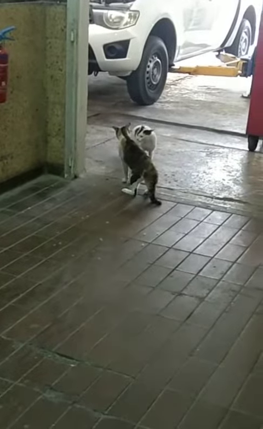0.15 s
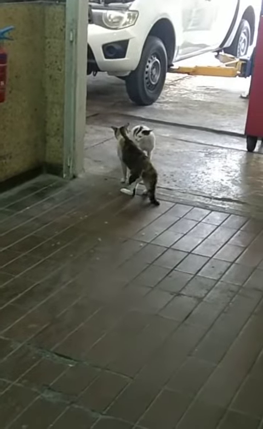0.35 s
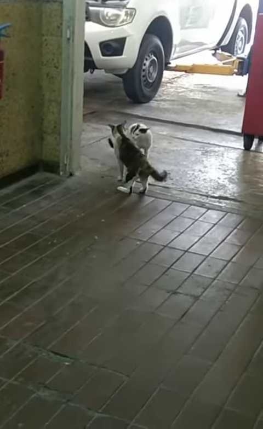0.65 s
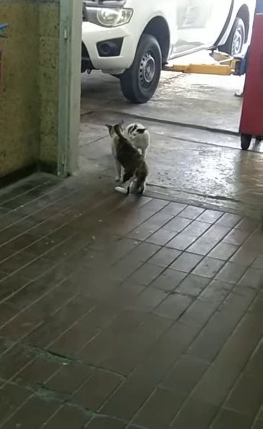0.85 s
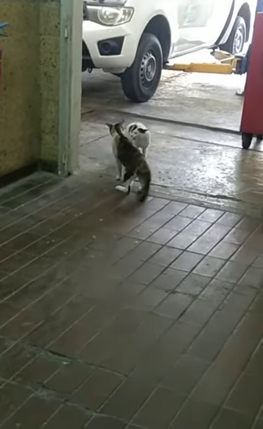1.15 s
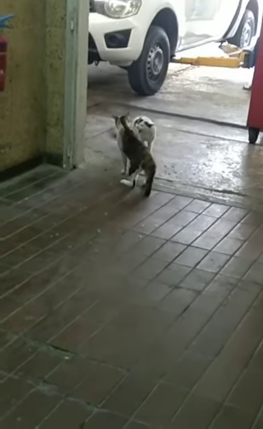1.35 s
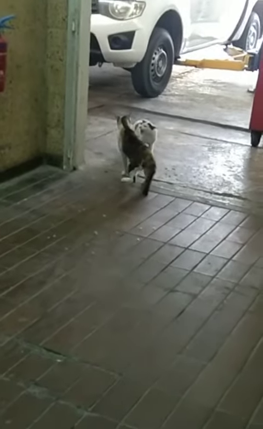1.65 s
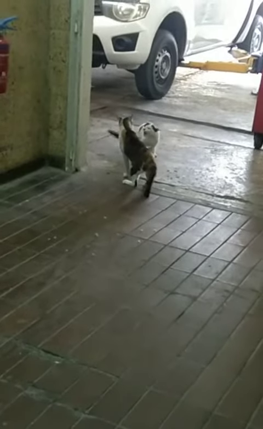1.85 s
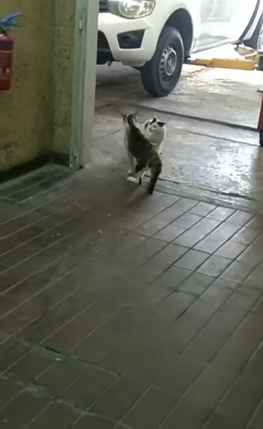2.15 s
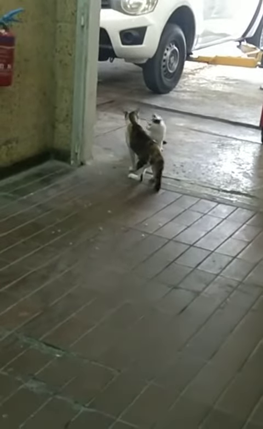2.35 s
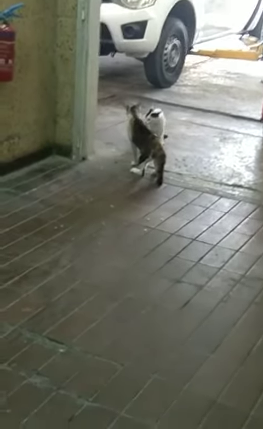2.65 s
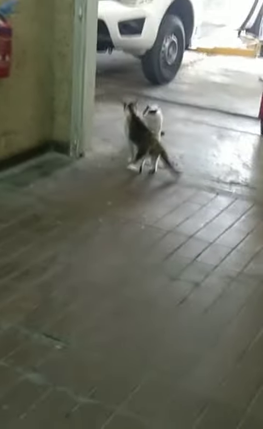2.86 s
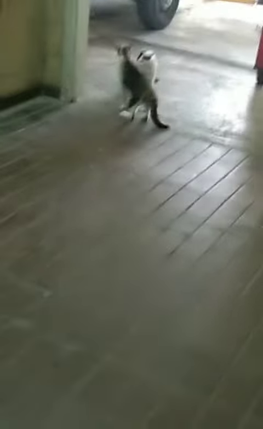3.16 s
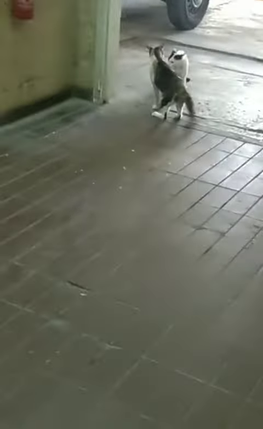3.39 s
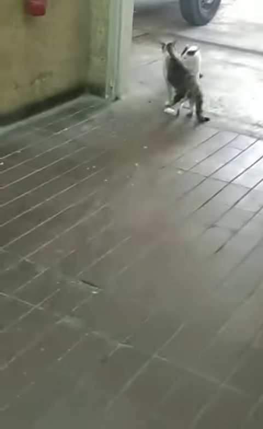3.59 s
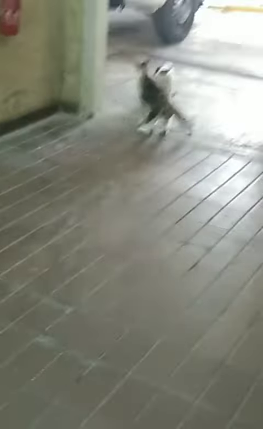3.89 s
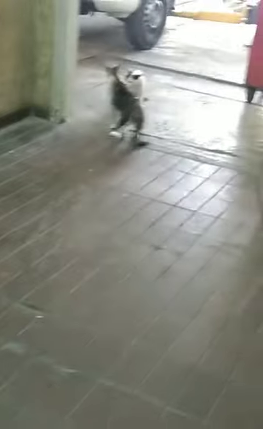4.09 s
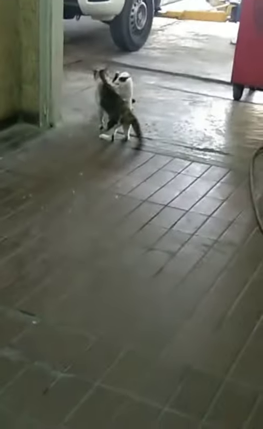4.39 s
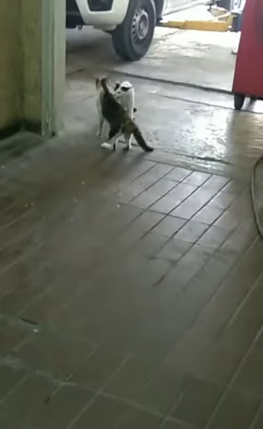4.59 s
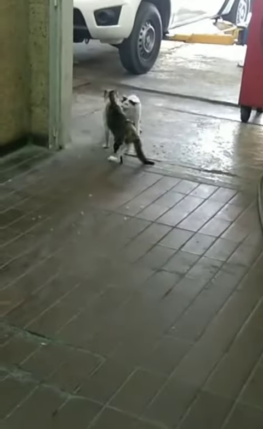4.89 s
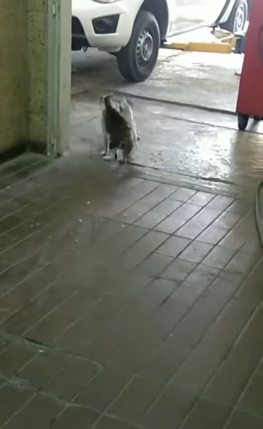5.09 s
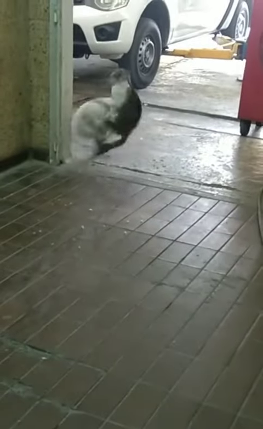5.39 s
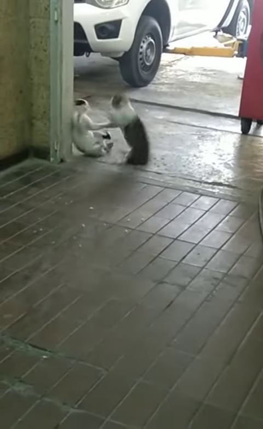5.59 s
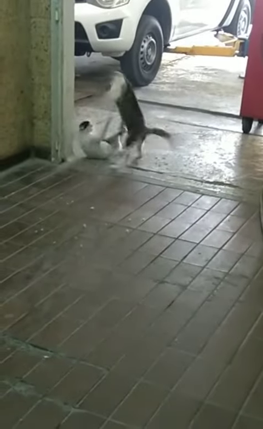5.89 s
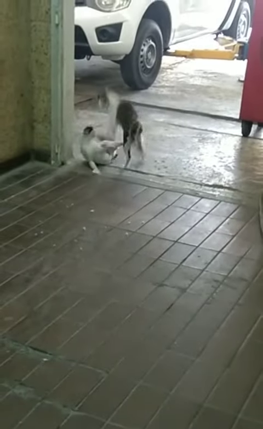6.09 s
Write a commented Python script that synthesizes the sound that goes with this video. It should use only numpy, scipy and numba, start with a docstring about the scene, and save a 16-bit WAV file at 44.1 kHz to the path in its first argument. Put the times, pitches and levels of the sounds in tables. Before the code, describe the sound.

A hard, tiled workshop rings with a cat confrontation heard from several metres away. Dull, quiet street rumble runs throughout, with faint airy hiss swelling at times. From 0 to 1.1 s one cat holds a subdued, clear, nasal closed-mouth moan, slowly rising. At about 1.15 s its mouth opens and the tone leaps louder, climbing into a hoarse, piercing scream until about 2 s, then slackening and falling. At 1.35 s the other cat spits, a sharp fading hiss over a low stuttering growl. The bright echo decays; 2.5-4.4 s is nearly quiet, with soft hiss swells and one tiny bright tick at 3.7 s. At 4.4 s a second yowl begins, quickly swelling to a rough scream peaking near 5.15 s, fading by 5.45 s. From 5.26 to 6 s the other cat screeches, ragged and lower, with another growling spit at 5.45 s. Loud sounds are gently held down.

```python
"""Two cats face off in a tiled, echoing workshop. The tabby yowls twice, each time rising from a clear
closed-mouth tone to a hoarse open-mouth scream; the other cat spits twice over a low growl and screeches near
the end. The voices are pulses and breath noise through moving resonances; the spits are shaped noise.
Street rumble, a faint swelling hiss and one tick lie below; a slow gain control holds loud sound down."""
import sys
import numpy as np
from scipy import signal
from scipy.io import wavfile
from scipy.ndimage import uniform_filter1d
from numba import njit

SR = 44100
rng = np.random.default_rng(int(sys.argv[2]) if len(sys.argv) > 2 else 0)


def master(y):
    """Save y as 16-bit WAV."""
    cut = np.clip(np.atleast_2d(y).T, -1, 1)
    pcm = np.round(cut * 32767)  # scale
    wavfile.write(sys.argv[1], SR, pcm.astype(np.int16))


N = 275168
CUTOFF_HZ = 16000   # top of the voice harmonics and of the final sound


def amp(db):
    """Decibels to gain."""
    return 10 ** (np.asarray(db) / 20)


def rms_one(x):
    """Scale to unit rms."""
    return x / np.sqrt(np.mean(x ** 2) + 1e-20)


def evened(x):
    """Hold the running rms at 1."""
    return x / np.sqrt(uniform_filter1d(x ** 2, size=2048) + 1e-12)


def in_time(rows):
    """Glide between table rows; the first column is seconds, each other gives one value a sample."""
    s, *columns = np.transpose(rows)
    return [np.interp(np.arange(N) / SR, s, c) for c in columns]


def sounding(rows, fade_s=0.015):
    """1 while a table lasts, with short fades outside it."""
    start_s, end_s = rows[0][0], rows[-1][0]
    return in_time([(start_s - fade_s, 0), (start_s, 1), (end_s, 1), (end_s + fade_s, 0)])[0]


def bump(at_s, spread_s, rise_share=1):
    """A smooth bell of height 1; the rise may be quicker than the fall."""
    late = (np.arange(N) / SR - at_s) / spread_s
    return np.exp(-.5 * np.where(late < 0, late / rise_share, late) ** 2)


def drift(rate_hz):
    """Slow random wander of unit rms."""
    r = np.exp(-2 * np.pi * rate_hz / SR)
    settled = signal.lfilter([1], [1, -2 * r, r * r], rng.standard_normal(N + SR))[SR:]
    return rms_one(settled)


def at_hz(points, hz):
    """Read a spectrum on a log-frequency axis."""
    return np.interp(np.log(hz), np.log(np.array(points)[:, 0]), np.array(points)[:, 1])


def band_pass(x, low_hz, high_hz):
    """Keep one band with gentle edges."""
    return signal.sosfilt(signal.butter(2, [low_hz, high_hz], "band", fs=SR, output="sos"), x)


EDGES_HZ = 22 * 2 ** np.arange(0, 9.8, .4)


def bands(size):
    """Noise bands of equal level per Hz with their centres; neighbours come from separate noises."""
    white = rng.standard_normal((2, size))
    for k, (low, high) in enumerate(zip(EDGES_HZ, EDGES_HZ[1:])):
        yield np.sqrt(low * high), band_pass(white[k % 2], low, high)


def coloured(spectrum, patchy_db):
    """Unit-rms noise of a given spectrum whose level flickers slowly."""
    # an octave below its first point the spectrum is 30 dB down
    closed = [(spectrum[0][0] / 2, spectrum[0][1] - 30)] + list(spectrum)
    noise = sum(amp(at_hz(closed, hz)) * band for hz, band in bands(N))
    return rms_one(amp(patchy_db * drift(7)) * noise)


@njit
def resonate(x, hz, width, rate):
    """Resonance with moving centre and width, gain 1 on top."""
    out = np.zeros(len(x))
    for i in range(2, len(x)):
        r = np.exp(-np.pi * width[i] / rate)
        driven = (1 - r * r) / 2 * (x[i] - x[i - 2])
        out[i] = driven + 2 * r * np.cos(2 * np.pi * hz[i] / rate) * out[i - 1] - r * r * out[i - 2]
    return out


def steady(x, hz, width_hz):
    """Resonance that stays in place."""
    return resonate(x, np.full(N, float(hz)), np.full(N, float(width_hz)), SR)


def twice(x, hz, width_hz):
    """A narrow and a twice wider resonance in a row keep the valleys dark."""
    return resonate(resonate(x, hz, width_hz, SR), hz, 2 * width_hz, SR)


# tone of the street rumble: pitch_hz, level_db (per Hz, relative)
RUMBLE_COLOUR = [(15, -49), (25, -14.5), (54, -7.5), (142, -6.5), (421, -25), (464, -19), (600, -29.5),
                 (637, -31), (746, -25.5), (945, -23.5), (2000, -37), (2170, -40), (2800, -54),
                 (3640, -67.5), (6160, -120)]
# level of the rumble before the gain control: time_s, level_db
RUMBLE_LEVEL = [(0, -49), (2, -47.5), (4, -51), (5.2, -44), (5.8, -42), (6.24, -43)]


def street_rumble():
    """Low coloured noise with a slowly changing level."""
    return amp(in_time(RUMBLE_LEVEL)[0]) * coloured(RUMBLE_COLOUR, patchy_db=0.9)


# tone of the faint hiss: pitch_hz, level_db (per Hz, relative)
HISS_COLOUR = [(880, -24.5), (1500, -12), (1950, 10.5), (2480, -8.5), (5400, 0), (7720, -6), (10000, -16.5),
               (11900, -27.5), (15000, -18)]
# swells of the hiss: peak_s, fall_spread_s, low_level_db, treble_level_db
HISS_SWELLS = [(0.08, 0.089, -53.5, -70), (0.38, 0.168, -52.5, -64), (0.85, 0.201, -54.5, -58),
               (2.4, 0.23, -62.5, -69.5), (2.76, 0.0378, -64.5, -78), (2.98, 0.0897, -64, -76.5),
               (3.33, 0.1673, -55.5, -68.5), (3.69, 0.068, -71.5, -69.5), (4.102, .1, -68, -94)]
HISS_SPLIT_HZ = 6540
HISS_REST_DB, HISS_REST_TREBLE_DB = -73, -106
SWELL_RISE_SHARE = .45   # a swell rises in this share of the time it takes to fall


def swelling_hiss():
    """Noise split in two at a crossover, each part swelling by its own amount."""
    low_gain, treble_gain = amp(HISS_REST_DB), amp(HISS_REST_TREBLE_DB)
    for peak_s, spread_s, low_db, treble_db in HISS_SWELLS:
        swell = bump(peak_s, spread_s, SWELL_RISE_SHARE)
        low_gain = low_gain + amp(low_db) * swell
        treble_gain = treble_gain + amp(treble_db) * swell
    hiss = coloured(HISS_COLOUR, patchy_db=1.5)
    low, treble = (rms_one(signal.sosfilt(signal.butter(4, HISS_SPLIT_HZ, side, fs=SR, output="sos"), hiss))
                   for side in ("low", "high"))
    return low_gain * low + treble_gain * treble


# upper resonances of a cat's head: centre_hz, width_hz, level_db (against the mouth, jaw fully open)
HEAD_RESONANCES = [(5965, 1356, -3.5), (7447, 1217, -7.5), (12040, 4900, -19.5)]
HEAD_LOW_HZ, TREBLE_CUT_HZ = 4350, 10030   # band left to the head resonances
SHUT_JAW_DB, NOSE_LIFT_DB = -27, 14   # head loss behind a shut jaw, and what humming gives back
SHUT_WIDTH_SHARE = 0.77   # mouth resonance width with the jaw shut, as a share of its open width
SHUT_TILT, HUM_TILT = 1.5, .3   # how steeply harmonics fall with the jaw shut: unhummed, hummed
CHEEK_HZ, CHEEK_WIDTH_HZ = 3224, 1200
NOSE_DIP_HZ, NOSE_DIP_WIDTH_HZ = 2900, 1300
STUMBLE_DB = 7   # unsteadiness of the fundamental at full roughness


def voice(call, rough, opening, nasal, mouth_db, blare_db, throat_width_hz, mouth_width_hz, cheek_db):
    """Vocal folds pulse, unevenly when rough, with breath noise; throat, cheeks, mouth and head resonate."""
    pitch_hz, throat_hz, mouth_hz, level_db, first_db = in_time(call)
    wobble = .003 * drift(12) + rough * (.025 * drift(40) + .03 * drift(250))
    phase = 2 * np.pi * np.cumsum(pitch_hz * (1 + wobble)) / SR
    fundamental = np.sqrt(2) * np.cos(phase)
    # a shut jaw softens the pulses
    tilt = (SHUT_TILT * (1 - nasal) + HUM_TILT * nasal) * (1 - opening)
    pulses = sum(np.cos(k * phase) * (k * pitch_hz < CUTOFF_HZ) * (k / 2) ** -tilt for k in range(2, 23))
    # breath comes in puffs, one a pulse
    breath = rng.standard_normal(N) * np.sqrt(SR / pitch_hz) * (1 + .5 * np.cos(phase)) / 2
    source = (1 - rough) * pulses + rough * breath
    for _ in range(2):   # the closed mouth swallows one band of the hum
        source = source - nasal * steady(source, NOSE_DIP_HZ, NOSE_DIP_WIDTH_HZ)

    throat = twice(source, throat_hz, np.full(N, throat_width_hz))
    # a closing jaw narrows the mouth resonance and muffles the head
    jaw_width_share = SHUT_WIDTH_SHARE + (1 - SHUT_WIDTH_SHARE) * opening
    mouth = twice(source, mouth_hz, mouth_width_hz * jaw_width_share)
    head = sum(amp(db) * twice(source, np.full(N, 1. * hz), np.full(N, 1. * width))
               for hz, width, db in HEAD_RESONANCES)
    head_gain = amp((SHUT_JAW_DB + NOSE_LIFT_DB * nasal) * (1 - opening))
    mouth -= head_gain * band_pass(head, HEAD_LOW_HZ, TREBLE_CUT_HZ)
    cheeks = twice(source, np.full(N, 1. * CHEEK_HZ), np.full(N, 1. * CHEEK_WIDTH_HZ))
    mouth -= amp(cheek_db) * opening * cheeks

    open_share = np.minimum(amp(mouth_db), .95)
    throat_share = np.sqrt(1 - open_share ** 2)   # the rest of the power stays in the throat
    upper = amp(blare_db) * throat_share * evened(throat) + open_share * evened(mouth)
    flutter = amp(1.635 * drift(50))   # the folds stumble
    first_gain = amp(first_db + STUMBLE_DB * rough * drift(25))
    return sounding(call) * (flutter * amp(level_db) * upper + first_gain * fundamental)


# tabby's yowls, one list each: time_s, pitch_hz, throat_hz, mouth_hz, level_db, fundamental_db
TABBY_YOWLS = [
    [(0, 500, 1020, 4133, -49.5, -47.5), (0.138, 538.1, 1204, 3800, -49, -48),
     (0.229, 610, 1248, 4100, -40, -50), (0.43, 621.9, 1287, 4217, -40, -48.5),
     (0.7, 625, 1448, 4054, -50, -40.5), (0.83, 628.8, 1376, 4500, -42, -60.5),
     (0.98, 655.4, 1370, 4800, -39.5, -45.5), (1.12, 665.9, 1290, 4834, -32.5, -43),
     (1.14, 669.9, 1367, 2730, -24.5, -39), (1.2, 743.9, 2240, 2990, -15.5, -42),
     (1.28, 806.2, 2340, 4270, -15.5, -39), (1.45, 894.5, 2290, 4850, -14, -38),
     (1.64, 974, 2380, 5120, -12, -41.5), (1.8, 1080, 2381, 5230, -10.5, -36.5),
     (1.95, 1049, 2280, 4755, -10.5, -33), (2.051, 879.1, 1940, 4736, -11.5, -32.5),
     (2.14, 694.3, 1499, 4913, -25.5, -44.5)],
    [(4.41, 442, 1220, 2535, -74.5, -55), (4.455, 711.8, 1318, 2005, -57, -42),
     (4.502, 616.2, 1264, 2450, -43.5, -58), (4.602, 662.7, 2114, 3080, -28, -47.5),
     (4.731, 697.8, 2360, 3730, -21.5, -39.5), (4.82, 786, 2170, 4510, -17.5, -38),
     (4.949, 843.6, 2240, 4890, -12.5, -39.5), (5.03, 1031, 2415, 5257, -10.5, -39.5),
     (5.149, 1132, 2255, 4896, -9, -41), (5.19, 1102, 2252, 5013, -9.5, -37),
     (5.24, 1088, 2190, 3352, -11, -32), (5.46, 1077, 2010, 3340, -29.5, -34)],
]
# stages of each yowl: jaw_opens_s, full_scream_s, slackens_s, hummed (through the nose before, 0-1),
# break_suddenness (exponent)
YOWL_STAGES = [(1.12, 1.34, 1.92, 1, 1.2), (4.6, 4.81, 5.14, 0, 3.5)]
# brief blares of the throat tone: peak_s, spread_s, gain_db
THROAT_BLARES = [(0.179, 0.0092, 6), (0.81, .03, 5.5), (0.894, 0.0094, 10), (1.017, 0.019, 6.5),
                 (1.121, 0.0072, 9), (4.514, 0.0071, 15), (4.549, 0.0072, 8), (4.616, 0.0177, 6.5)]
CLEAR, SCREAM, SLACK = .03, .55, .25   # roughness 0-1 of each stage
SLACKEN_S, NOSE_SHUTS_S = .08, .05
SLACK_JAW = .6   # jaw opening 0-1 at the end of a yowl
OPEN_MOUTH_DB = -0.53   # strength of the open mouth resonance; the other stages lose the following
HUM_MOUTH_DB, SHUT_MOUTH_DB, SLACK_MOUTH_DB = -9, -18, -10.5


def tabby():
    """Two yowls: the opening jaw moves the tone into the mouth; it breaks into a hoarse scream and slackens."""
    out = 0
    blare_db = sum(db * bump(s, spread_s) for s, spread_s, db in THROAT_BLARES)
    for call, (opens, full, slackens, hummed, sudden) in zip(TABBY_YOWLS, YOWL_STAGES):
        # time_s, jaw opening 0-1, roughness of the open voice, fading 0-1
        opening, strain, fading = in_time([
            (opens, 0, SCREAM, 0), (full, 1, SCREAM, 0), (slackens, 1, SCREAM, 0),
            (slackens + SLACKEN_S, 1, SLACK, 0), (call[-1][0], 1, SLACK, 1)])
        rough = CLEAR + (strain - CLEAR) * opening ** sudden
        shut_db = HUM_MOUTH_DB if hummed else SHUT_MOUTH_DB
        mouth_db = OPEN_MOUTH_DB + shut_db * (1 - opening) ** 2 + SLACK_MOUTH_DB * fading
        nasal, = in_time([(opens, hummed), (opens + NOSE_SHUTS_S, 0)])
        jaw = opening - (1 - SLACK_JAW) * fading
        out = out + voice(call, rough, jaw, nasal, mouth_db, blare_db,
                          throat_width_hz=708.0, mouth_width_hz=632.0, cheek_db=-11.0)
    return out


# ring of the hard walls: pitch_hz, t60_s
HALL_DECAY = [(300, 0.38), (600, 0.4366), (1300, 0.5974), (3500, 0.929), (9000, 0.72), (15000, .6)]
HALL_DB = 1   # level of the cats' echo against their direct sound


def hall(x):
    """Dense echoes of hard walls, each band dying at its own rate."""
    t = np.arange(int(1.5 * SR)) / SR
    tail = sum(band * amp(-60 * t / at_hz(HALL_DECAY, hz)) for hz, band in bands(len(t)))
    tail = tail * np.minimum(t / 0.0057, 1)   # the echoes build up over a few milliseconds
    return signal.fftconvolve(x, tail / np.sqrt(np.sum(tail ** 2)))[:N]


# tone of the spits: pitch_hz, level_db (per Hz, relative)
SPIT_TONE = [(300, 0.5), (1000, 2), (3300, 0), (6000, 13.5), (9000, -2), (12000, 1), (15500, -7)]
# other cat's spits: start_s, length_s, hiss_db, growl_db
CAT_SPITS = [(1.336, .6, -16, -41.5), (5.449, 0.571, -13, -35.5)]
SPIT_ATTACK_S = 0.0471
SPIT_FADE_DB = 25   # drop from peak to end, for each second of the spit's whole length
GROWL_HZ, GROWL_STUTTER_DB = 303.6, 4
GROWL_PEAK_S, GROWL_SPREAD_S = 0.2063, .1   # peak after the start of the spit, and bell spread


def spits():
    """Hissing noise bursts and fades; noise in a narrow resonance stutters as a low growl under it."""
    hiss = coloured(SPIT_TONE, patchy_db=2.0)
    growl = rms_one(steady(rng.standard_normal(N), GROWL_HZ, width_hz=14))
    growl = growl * amp(GROWL_STUTTER_DB * drift(8.7))
    out = np.zeros(N)
    for s, length, hiss_db, growl_db in CAT_SPITS:
        burst = [(s, hiss_db - 21.5), (s + SPIT_ATTACK_S, hiss_db),
                 (s + length, hiss_db - SPIT_FADE_DB * length)]
        out += sounding(burst) * amp(in_time(burst)[0]) * hiss
        out += amp(growl_db) * bump(s + GROWL_PEAK_S, GROWL_SPREAD_S) * growl
    return out


# a small bright tick: time_s, click_db (before the resonances)
BRIGHT_TICK = [(3.6724, -26.5)]


def tick():
    """A one-sample click rings two wide treble resonances, direct and through the hall."""
    clicks = np.zeros(N)
    for s, db in BRIGHT_TICK:
        clicks[round(s * SR)] = amp(db)
    ring = steady(steady(clicks, hz=7850, width_hz=3000), hz=7903, width_hz=5000)
    return ring + hall(ring)


# other cat's screech: time_s, pitch_hz, throat_hz, mouth_hz, level_db, fundamental_db
CAT_SCREECH = [(5.26, 621.8, 1163, 1870, -28.5, -46.5), (5.29, 635.5, 1243, 1850, -13.5, -53),
               (5.36, 666.7, 1360, 1903, -13.5, -57.5), (5.43, 609.1, 1348, 1917, -13.5, -41.5),
               (5.501, 620, 1330, 2030, -14, -48), (5.649, 702.5, 1197, 2198, -12, -45),
               (5.73, 727.4, 1206, 2210, -14, -65), (5.761, 834.6, 1288, 2148, -11.5, -63),
               (5.95, 856.3, 1352, 2204, -11, -62), (6.041, 865.2, 1350, 2320, -21.5, -61.5)]
SCREECH_ROUGH, SCREECH_JAW = .58, 0.777   # roughness and jaw opening, 0-1
SCREECH_MOUTH_DB, SCREECH_WAVER_DB = -10, 1   # mouth strength, waver of the throat tone


def screech():
    """A ragged, breathy voice held with a partly open jaw, its throat tone wavering."""
    return voice(CAT_SCREECH, SCREECH_ROUGH, np.full(N, SCREECH_JAW), 0, SCREECH_MOUTH_DB,
                 SCREECH_WAVER_DB * drift(11), throat_width_hz=617.0, mouth_width_hz=389.0, cheek_db=-29.5)


def scene():
    """Both cats, direct and through the hall, over rumble, hiss and tick."""
    background = street_rumble() + swelling_hiss() + tick()
    cats = tabby() + spits() + screech()
    return (cats + amp(HALL_DB) * hall(cats) + background)[None]


MIC_LOW_HZ = 50.46
GAIN_KNEE_DB, GAIN_LAG_S = -35.5, 0.1423
GAIN_SHARE = 0.3691   # share of the level above the knee that is taken away


def record(dry):
    """A sluggish gain control turns loud sound down; the lowest bass and highest treble are cut."""
    dry = signal.sosfilt(signal.butter(2, MIC_LOW_HZ, "high", fs=SR, output="sos"), dry)
    level_db = 10 * np.log10(uniform_filter1d(dry[0] ** 2, size=2048) + 1e-12)
    wanted_cut_db = GAIN_SHARE * np.maximum(level_db - GAIN_KNEE_DB, 0)
    r = np.exp(-1 / (GAIN_LAG_S * SR))
    cut_db = signal.lfilter([1 - r], [1, -r], wanted_cut_db)
    return signal.sosfilt(signal.cheby2(16, 70, CUTOFF_HZ, fs=SR, output="sos"), dry * amp(-cut_db))


dry = scene()
out = record(dry)
master(out)
```